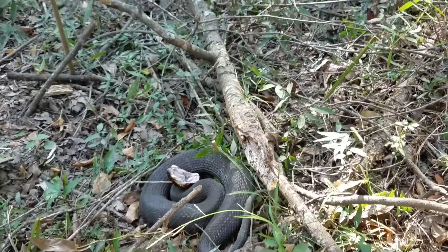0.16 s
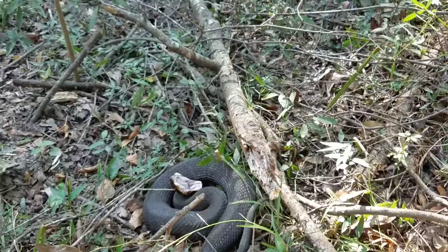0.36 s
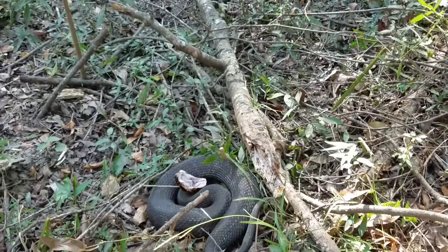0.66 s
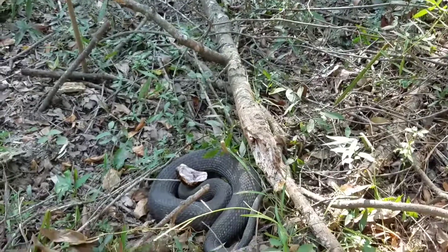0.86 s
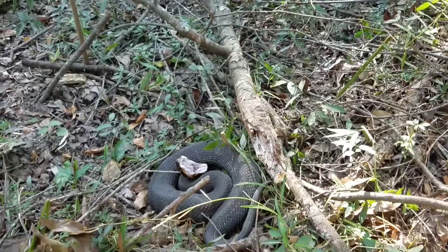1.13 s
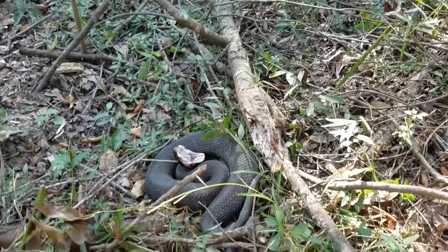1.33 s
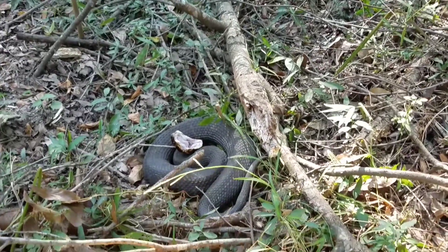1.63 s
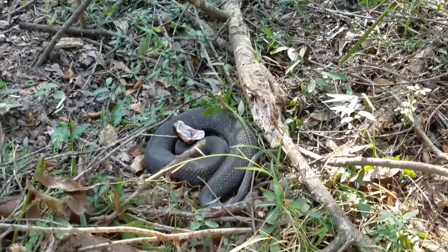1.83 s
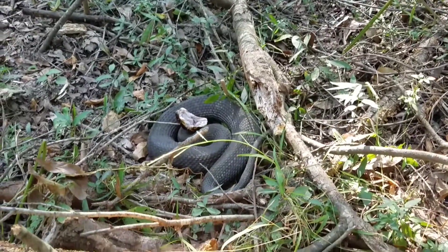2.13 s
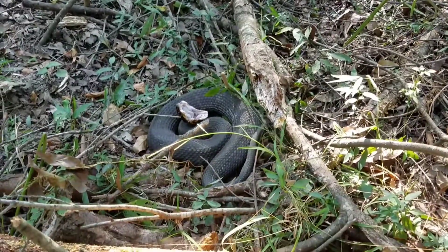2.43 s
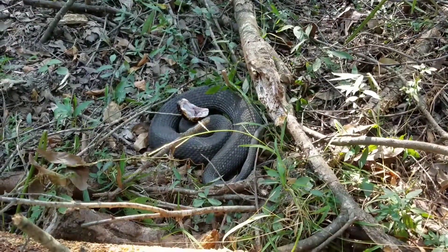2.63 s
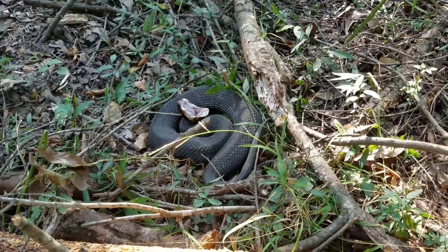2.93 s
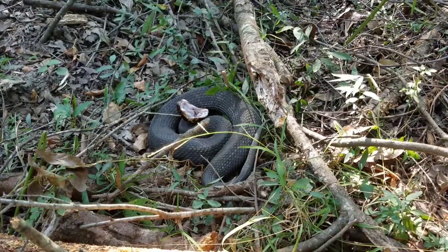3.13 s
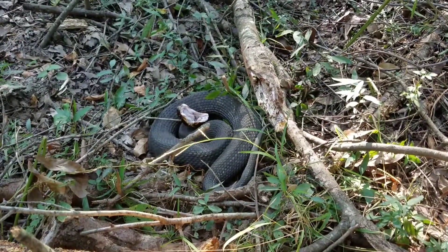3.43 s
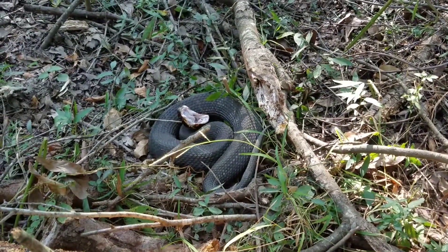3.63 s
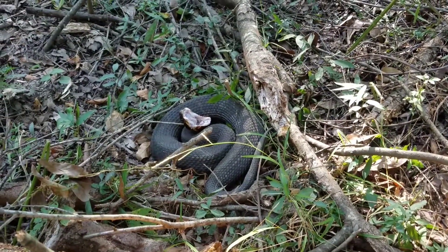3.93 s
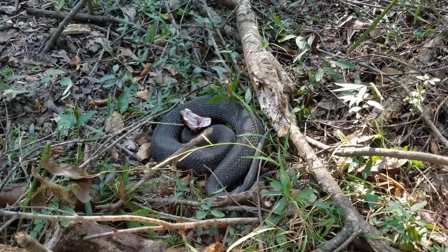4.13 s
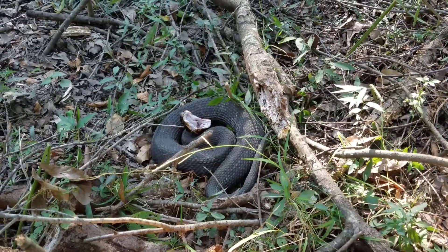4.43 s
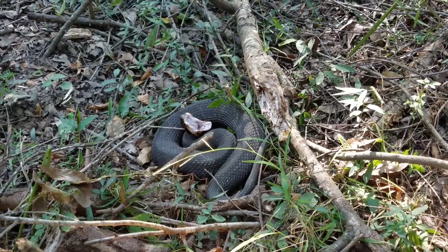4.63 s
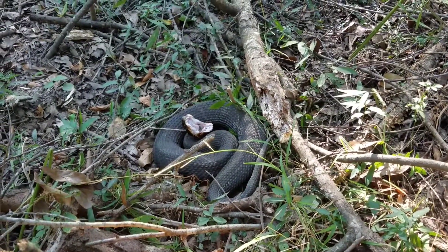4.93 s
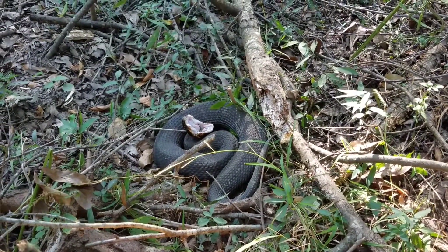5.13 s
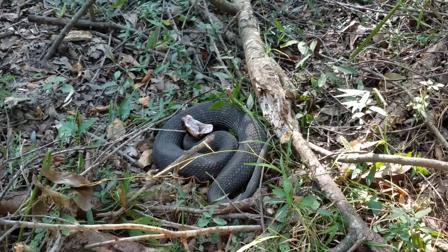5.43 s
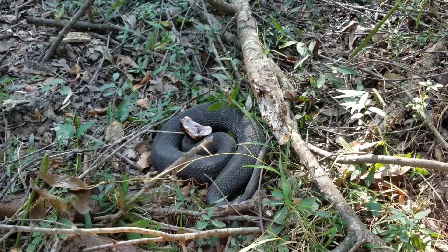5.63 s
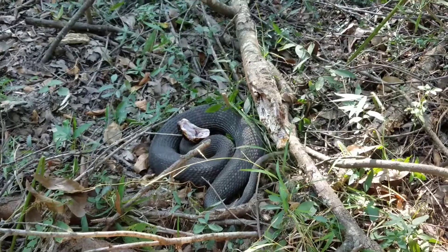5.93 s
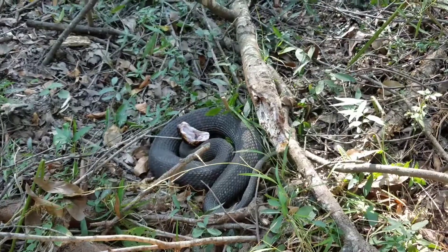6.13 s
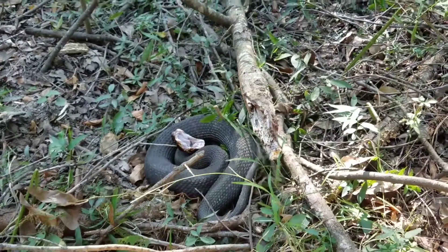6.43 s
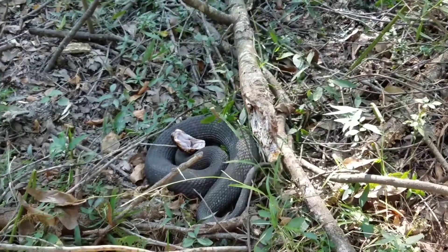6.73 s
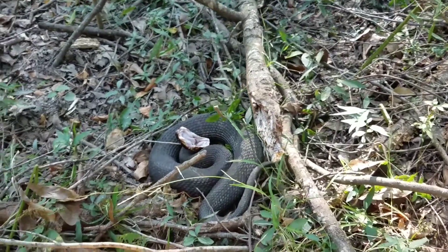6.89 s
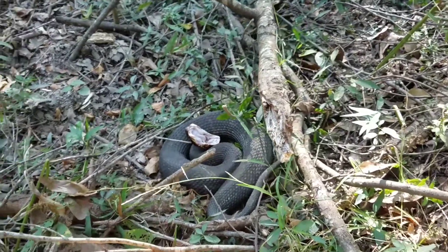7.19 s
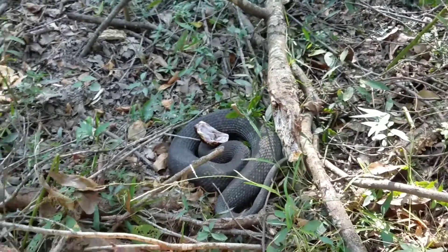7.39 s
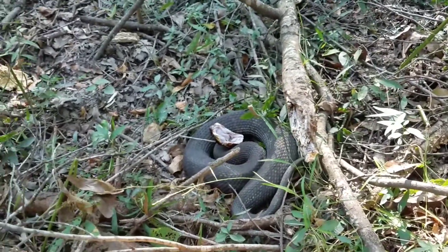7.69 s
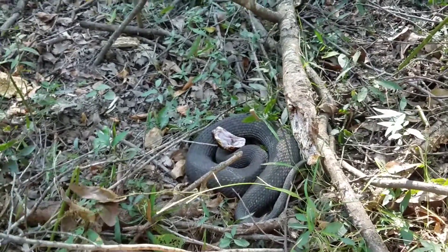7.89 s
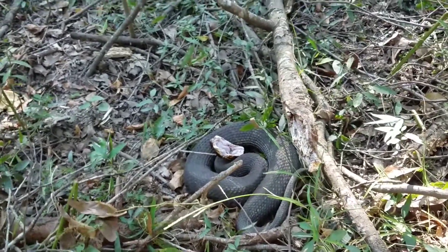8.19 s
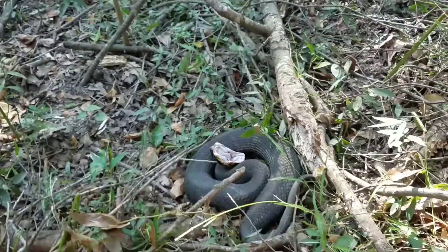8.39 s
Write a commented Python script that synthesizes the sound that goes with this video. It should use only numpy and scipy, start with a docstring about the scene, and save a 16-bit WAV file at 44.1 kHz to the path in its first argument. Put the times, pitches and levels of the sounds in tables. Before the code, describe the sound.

Soft outdoor hush, steady high insect tone and far-off puttering; light leaf touches give way to a short crunch and longer snapping rustle.

```python
"""A quiet forest floor: an insect trills thinly over a high chorus, and an engine putters far away.
Dry leaf litter is brushed lightly at first, then is pressed and shifted near a coiled snake:
a short crunch and a longer crackling rustle with sharp snaps of leaves and twigs.
Leaves are noise shaped by many tiny fractures, snaps are short noise bursts, the trill is a gliding
tone, the engine is a sum of exhaust harmonics, and the air and the chorus are coloured noise."""
import sys
import numpy as np
from scipy import signal
from scipy.fft import rfft, irfft, next_fast_len
from scipy.io import wavfile
from scipy.ndimage import uniform_filter1d

SR = 44100
rng = np.random.default_rng(int(sys.argv[2]) if len(sys.argv) > 2 else 0)


def transcribe(signal):
    """Save signal, clipped to [-1, 1], as a 16-bit WAV file at the path in sys.argv[1]."""
    frames = np.atleast_2d(signal).T
    limited = np.clip(frames, -1, 1)
    pcm = np.round(limited * 32767).astype(np.int16)
    wavfile.write(sys.argv[1], SR, pcm)


N = 377039
TIME = np.arange(N) / SR  # seconds
CUTOFF_HZ = 15800  # nothing much is heard above this
FIRM_DB = -48  # the level on the pressure curve that counts as firm pressure

# how alike left and right are in the open air: (frequency [Hz], likeness [-1 to 1])
AIR_LIKENESS = [(100, 0.77), (300, 0.054), (800, 0.048), (2000, 0), (5000, 0)]


def from_db(db):
    """Turn decibels into a gain."""
    return 10 ** (np.asarray(db) / 20)


def rms_one(x):
    """Scale a signal to an rms of 1."""
    return x / np.sqrt(np.mean(x ** 2) + 1e-20)


def in_time(rows):
    """Draw straight lines between the rows of a curve and read each column at every sample."""
    times, *columns = np.transpose(rows)
    return [np.interp(TIME, times, column) for column in columns]


def at_hz(points, hz):
    """Read a curve over frequency, with straight lines on a log-frequency axis."""
    known_hz, values = np.transpose(points)
    return np.interp(np.log(hz + 1), np.log(known_hz), values)


def panned(pan_db):
    """Left and right gains of constant power; pan_db is left minus right."""
    gains = from_db(np.array([[.5], [-.5]]) * pan_db)
    return gains / np.sqrt(np.mean(gains ** 2, axis=0))


def drift(rate_hz):
    """A smooth random wander around 0 with an rms of 1; a higher rate wanders faster."""
    step = 40  # samples between the points of the wander
    pole = np.exp(-2 * np.pi * rate_hz * step / SR)
    noise = rng.standard_normal(N // step + 2002)
    slow = signal.lfilter([1], [1, -2 * pole, pole * pole], noise)[2000:]  # skip the filter's start
    return np.interp(np.arange(N) / step, np.arange(len(slow)), rms_one(slow))


def band(x, low_hz, high_hz, order=2):
    """Keep only the frequencies between two edges."""
    edges = [low_hz, min(high_hz, .48 * SR)]
    return signal.sosfilt(signal.butter(order, edges, "band", fs=SR, output="sos"), x + 1e-18)


def decay(x, t60):
    """Let every impulse die away exponentially, by 60 dB in t60 seconds."""
    return signal.lfilter([1], [1, -from_db(-60 / (t60 * SR))], x + 1e-18)


def white():
    """Unrelated white noise for two channels."""
    return rng.standard_normal((2, N))


def coloured(x, spectrum, likeness):
    """Give two unrelated signals a spectrum and a likeness of left and right; rms 1."""
    size = next_fast_len(N)
    hz = np.arange(size // 2 + 1) * SR / size
    lowest_hz, highest_hz = spectrum[0][0], spectrum[-1][0]
    # fade out beyond both ends of the spectrum
    inside = 1 / (1 + (lowest_hz / (hz + 1)) ** 8) / (1 + (hz / highest_hz / 1.15) ** 16)
    mid, side = rfft(x, size) * from_db(at_hz(spectrum, hz)) * inside
    alike = at_hz(likeness, hz)
    stereo = np.sqrt(1 + alike) * mid + np.sqrt(1 - alike) * side * [[1], [-1]]
    return rms_one(irfft(stereo, size)[:, :N])


def gesture(start, hold, attack, release):
    """Rise to 1 by the start, hold, and fall back to 0 (all in seconds)."""
    rise = (TIME - start) / attack
    fall = (start + hold - TIME) / release
    return np.clip(np.minimum(rise, fall) + 1, 0, 1)


def air():
    """The still air is a soft, steady, mostly low noise."""
    # colour of the air: (frequency [Hz], relative level [dB])
    air_colour = [(25, -14), (50, 5.5), (110, 13), (200, 2), (300, 0), (500, -4), (1000, -7), (2500, -10.5),
                  (4000, -16), (6500, -21), (10000, -22.5), (15500, -12)]
    return from_db(-62.5) * coloured(white(), air_colour, AIR_LIKENESS) * panned(-1.7)


def insects():
    """A near insect's wing strokes each give a short arched note; many far ones merge into a noise band."""
    # near insect: (time [s], level [dB])
    trill_level = [(2.03, -53), (2.08, -68), (2.35, -56), (3.5, -55), (6.8, -54.5), (7.9, -59)]
    # colour of the far chorus: (frequency [Hz], relative level [dB])
    chorus_colour = [(6900, -39), (7400, -13.5), (7750, -0.5), (8100, 2), (8450, 4.5), (8650, -3.5),
                     (8850, -8.5), (9200, -18)]
    level_db, = in_time(trill_level)
    # 32.38 strokes per second; the place within a stroke runs from -0.5 to 0.5
    stroke = (32.38 * TIME + .04 + .05 * drift(1)) % 1 - .5
    note = np.exp(-np.abs(stroke / 0.19) ** 3)
    # the pitch is highest in the middle of the note
    pitch_hz = 8610 - 100 * np.minimum((stroke / .16) ** 2, 3) + 18 * drift(40)
    tone = np.sin(2 * np.pi * np.cumsum(pitch_hz) / SR)
    trill = note * tone * from_db(level_db + 0.58 * drift(33))
    chorus = from_db(-64.5) * coloured(white(), chorus_colour, AIR_LIKENESS)
    return trill * panned(-33.0) + chorus * panned(-0.47)


def engine():
    """Exhaust pulses follow the revs; muffler and distance leave a low thud, a weak pipe ring and a drone."""
    # speed of the engine: (time [s], exhaust pulses per second [1/s])
    engine_rate = [(0,22.7),(.25,23.5),(.92,21.6),(1.74,17.4),(2.05,23.7),(2.38,17),(2.75,21.2),(3.05,20.1),(3.85,26.5),(4.45,27.8),(4.8,26.6),(5.12,27.8),(6.6,24),(6.95,28),(7.33,26.2),(7.8,19.7),(7.97,24),(8.55,25.3)]
    # loudness of its thud: (time [s], level [dB])
    engine_level = [(0.0, -56), (0.04, -58), (1.74, -61.5), (2.07, -57), (2.36, -67), (2.6, -58),
                    (3.83, -58), (3.88, -61), (4.93, -55), (5.07, -61), (5.38, -59), (7.36, -56),
                    (7.43, -50.5), (7.81, -53.5), (7.83, -59), (8.19, -54), (8.48, -58), (8.55, -52)]
    # exhaust harmonics 1 to 8: (relative level under load [dB], with the throttle shut [dB])
    exhaust = [(-27, -21), (-9, -8), (-30, 6), (-13.5, 5.5), (3, 9), (3, 0), (-11, -18), (-4, -20)]
    (rate,), (level_db,) = in_time(engine_rate), in_time(engine_level)
    shut = gesture(start=7.39, hold=0.17, attack=0.11, release=0.44)  # the engine coasts once
    phase = 2 * np.pi * np.cumsum(rate * (1 + 0.0013 * drift(8.3))) / SR

    pulses = np.zeros(N)
    for harmonic, (loaded_db, coasting_db) in enumerate(exhaust, 1):
        harmonic_db = loaded_db + shut * (coasting_db - loaded_db)
        pulses += from_db(harmonic_db) * np.cos(harmonic * phase)
    uneven = pulses * from_db(1.34 * drift(22))
    thud = signal.sosfilt(signal.butter(10, 137, fs=SR, output="sos"), uneven)
    thud = thud / np.sqrt(uniform_filter1d(thud ** 2, size=8000) + 1e-9)  # even out the loudness

    firings = np.diff(phase // (2 * np.pi), prepend=0)  # one click per exhaust pulse
    pipe_db = np.interp(rate, [18, 26], [-77, -85])  # the pipe rings most at low revs
    pipe = from_db(pipe_db) * rms_one(band(firings, 252, 291))
    drone = from_db(-77.5) * rms_one(band(rng.standard_normal(N), 183.3, 195.0))
    return (from_db(level_db) * thud + pipe + drone) * panned(-2.1)


def bumps():
    """Weight settling on soft soil gives short dull knocks: fading noise with its treble removed."""
    # knocks: (time [s], peak level before the common lift [dB], upper edge [Hz])
    knocks = [(0.092,-51,760),(0.262,-52.5,413),(.612,-60,694),(2.496,-55,385),(6.126,-40,1010),(6.775,-47.5,694),(6.864,-52,502),(7.149,-38.5,750),(7.246,-38.5,500),(7.371,-43.5,613),(7.491,-57,413),(7.723,-40.5,450),(7.974,-55,402.5)]
    lift_db = 3.5
    out, size = np.zeros(N), SR // 6
    fade = from_db(-60 * np.arange(size) / SR / 0.066)  # 60 dB in 0.066 s
    for (s, peak_db, top_hz), noise in zip(knocks, rng.standard_normal((len(knocks), size))):
        knock = band(noise * fade, 92, top_hz)
        start = int(s * SR)
        out[start:start + size] += knock / np.abs(knock).max() * from_db(peak_db + lift_db)
    return out


def fractures(per_s, spread_db, t60):
    """Power of tiny leaf fractures: random moments, mostly small, each dying fast; local mean about 1."""
    sizes = from_db(spread_db * np.minimum(rng.exponential(1, N), 3.5))
    breaks = rng.random(N) < per_s / SR
    power = decay(breaks * sizes ** 2, t60 / 2)  # power needs half the t60 of the sound
    return power / (uniform_filter1d(power, size=4000) + 1e-3)


def crackle(given, spectrum, per_s, spread_db, t60, own, scatter):
    """Fractures, a given part of them its own and the rest handed in, over a smooth leaf hiss."""
    # how alike left and right are: (frequency [Hz], likeness [-1 to 1])
    leaf_likeness = [(200, 0.79), (600, 0.92), (1300, 0.8), (2600, -0.32), (6000, 0.058), (12000, -0.086)]
    power = (1 - own) * given + own * fractures(per_s, spread_db, t60) + scatter
    return coloured(white() * np.sqrt(power), spectrum, leaf_likeness)


def touch():
    """Strength of the light brushing: each touch swells, holds and lets go."""
    # light touches: (time [s], length [s], level [dB])
    touches = [(.01, 0.16, -61.5), (0.34, .22, -66), (1.77, 0.24, -70.5), (2.202, 0.414, -60.5),
               (5.26, .1, -67.5), (5.718, 0.31, -67.5)]
    return sum(from_db(db) * gesture(s, length, attack=0.14, release=0.11) for s, length, db in touches)


def brushing():
    """Leaves that barely touch give uneven swishes with faint ticks in them."""
    # colour of the brushing: (frequency [Hz], relative level [dB])
    brush_colour = [(250, -2.5), (1200, -6.5), (2300, -13), (3000, -1), (5000, -8.5), (6200, -4),
                    (7100, -17.5), (10300, 2), (11800, -12), (13300, 2), (15500, -18)]
    ticks = fractures(160, spread_db=17.0, t60=0.011)
    swish = touch() * from_db(3.0 * drift(4.4))
    leaves = crackle(ticks, brush_colour, 490, spread_db=13.5, t60=0.011, own=0.4, scatter=0.62)
    return swish * panned(-4.0) * leaves


def pressure():
    """How hard the litter is pressed, in dB above firm pressure."""
    # pressure in the short crunch: (time [s], level [dB])
    crunch_curve = [(5.72, -79), (5.96, -62.5), (6.11, -40), (6.18, -42.5), (6.25, -58.5), (6.47, -56.5),
                    (6.66, -62)]
    # pressure in the longer rustle: (time [s], level [dB])
    rustle_curve = [(6.74, -57.0), (6.79, -53.5), (6.89, -52.5), (7.04, -45.5), (7.179, -46.5),
                    (7.281, -40), (7.33, -45.5), (7.384, -38), (7.48, -51.0), (7.6, -53.5), (7.68, -47.5),
                    (7.745, -41), (7.83, -49.0), (8.0, -51.5), (8.1, -50.0), (8.28, -54.0), (8.44, -51),
                    (8.55, -55.5)]
    level_db, = in_time([*crunch_curve, *rustle_curve])
    return level_db - FIRM_DB


def pressed():
    """The litter lies still until it is pressed: 0, then 1."""
    return np.clip((TIME - 5.72) / 0.1, 0, 1)


def leaf_pops():
    """Curled leaves spring back, in time more often, each with a hollow pop at one of ten pitches."""
    per_s = np.interp(TIME, [5.9, 6.2, 7.5, 7.8], [0, 10, 14, 55])
    sizes = from_db(4 * np.minimum(rng.exponential(1, N), 1.8))
    clicks = (rng.random(N) < per_s / SR) * sizes
    pitches_hz, dealt = np.geomspace(1150, 2100, num=10), rng.integers(0, 10, N)
    pops = np.zeros(N)
    for k, hz in enumerate(pitches_hz):
        pops += signal.lfilter(*signal.iirpeak(hz, 4, fs=SR), clicks * (dealt == k) + 1e-18)
    return from_db(np.minimum(pressure(), -3) - 14.0) * pops * panned(-3.5)


def lesser_snaps(count):
    """Small snaps fall at random, sized by how much the leaves move; same columns as the loud snaps."""
    # level above the movement around the snap: (body [dB], crack [dB], crisp top [dB])
    above_movement = (-1.5, -0.73, 3.6)
    spread_db, limit_db = 2.5, -57  # scatter between snaps; movement beyond which they grow no louder
    moving = touch() + pressed() * from_db(FIRM_DB + pressure())
    moving = np.minimum(moving, from_db(limit_db))
    at, chance = rng.integers(0, N, count), rng.standard_normal((count, 4))
    moving_db = 20 * np.log10(moving[at, None] + 1e-9)
    levels_db = moving_db + above_movement + spread_db * chance[:, :3]
    pan_db = 4 * chance[:, 3] - 2
    return np.column_stack([at / SR, levels_db, pan_db])


def snap_band(rows, levels_db, low_hz, high_hz, break_t60, leaf_db, leaf_t60, tail_db, tail_t60, alike, ring_db):
    """Each snap: an abrupt break, a short ringing of its own leaf, a faint tail off the ground."""
    out, size = np.zeros((2, N + SR // 4)), SR // 8
    t = np.arange(size) / SR
    shape = from_db(-60 * t / break_t60)
    shape = shape + from_db(leaf_db - 60 * t / leaf_t60) + from_db(tail_db - 60 * t / tail_t60)
    noise, places = rng.standard_normal((len(rows), 2, size)), rng.random(len(rows))
    pairs = np.sqrt(1 + alike) * noise[:, :1] + np.sqrt(1 - alike) * noise[:, 1:] * [[1], [-1]]
    bursts = band(pairs * shape, low_hz, high_hz)
    for (s, *_, pan_db), level_db, place, burst in zip(rows, levels_db, places, bursts):
        # each leaf rings at its own pitch within the band
        leaf_hz = low_hz + (.2 + .6 * place) * (min(high_hz, CUTOFF_HZ) - low_hz)
        burst = burst + from_db(ring_db) * signal.lfilter(*signal.iirpeak(leaf_hz, 6, fs=SR), burst)
        # the rms of the first 5 ms sets the level
        attack = np.sqrt(np.mean(burst[:, :SR // 200] ** 2, axis=1, keepdims=True))
        start = int(s * SR)
        out[:, start:start + size] += burst / attack * from_db(level_db) * panned(pan_db)
    return out[:, :N]


def snaps():
    """Brittle leaves and twigs break, in three bands; their low part rings longest."""
    # loudest snaps, levels before each band's trim:
    # (time [s], body level [dB], crack level [dB], crisp top level [dB], left minus right [dB])
    loud_snaps = [(0.041, -59, -54.5, -44.5, -4.5), (0.231, -62.5, -58, -51, 1),
                  (0.3455, -64, -69, -44, -4), (0.3707, -66, -54.5, -47, -2), (0.4845, -59.5, -53, -43, -2),
                  (1.9681, -61, -68, -49.5, -2), (2.039, -65, -52.5, -49.5, -4), (2.09, -77, -41.5, -39, 0),
                  (2.1158, -73, -55, -73, -2), (2.1415, -81, -48.5, -71, 0), (2.209, -70, -62, -42.5, 0),
                  (3.794, -63.5, -65, -68, -7), (5.2782, -57.5, -84, -65, -3), (5.645, -63.5, -62, -58, -6),
                  (5.798, -57, -61.5, -54, 1), (5.8805, -44.5, -47, -42.5, 0), (5.9916, -45, -53, -46, -4),
                  (6.1293, -38.5, -56, -37, 0), (6.1593, -38.5, -37, -44, 6), (6.1936, -42.5, -36, -52, -3),
                  (6.2272, -76, -46.5, -35, -4), (6.6735, -52, -36, -43, -4),
                  (6.775, -37.5, -36.5, -33.5, -2.5), (6.8641, -35.5, -40, -43.5, -2.5),
                  (6.9842, -57, -37.5, -37.5, -5), (7.0181, -44, -39.5, -46, -2),
                  (7.091, -36, -39.5, -38, -2), (7.1342, -48, -58, -34, 2), (7.37, -37.5, -45, -47, -1),
                  (7.3854, -57, -52, -34, 4), (7.4002, -52, -51, -27.5, 6), (7.492, -55, -41, -27, 0),
                  (7.51, -46.5, -46, -44, -4), (7.5963, -73, -51, -30, -1), (7.6518, -39.5, -57, -35.5, 0),
                  (7.7033, -43, -37, -28.5, -6), (7.72, -42, -33, -29, -5), (7.7251, -33.5, -33, -20, 5),
                  (7.731, -41, -33.5, -30, -3), (7.7972, -51, -38, -25.5, -3),
                  (7.8551, -41, -46.5, -39, -1), (7.9485, -43, -46, -40.5, -2), (8.0483, -46, -44, -37, -4),
                  (8.0575, -42, -41.5, -35.5, 2), (8.3058, -35.5, -42, -36, 2), (8.4257, -40, -42, -46, 3),
                  (8.4409, -40, -50, -41, 1), (8.4783, -40, -44, -35, 5)]
    rows = np.vstack([loud_snaps, lesser_snaps(count=60)])
    _, body_db, crack_db, top_db, _ = rows.T
    body = snap_band(rows, body_db, 750, 2600, break_t60=.003, leaf_db=-6, leaf_t60=.02,
                     tail_db=-24, tail_t60=.12, alike=.35, ring_db=4)
    crack = snap_band(rows, crack_db, 1940, 7680, break_t60=0.00075, leaf_db=-2, leaf_t60=0.022,
                      tail_db=-40, tail_t60=0.049, alike=-0.32, ring_db=12.5)
    top = snap_band(rows, top_db, 9900, 23300, break_t60=0.00068, leaf_db=-9.5, leaf_t60=0.016,
                    tail_db=-28, tail_t60=0.038, alike=0, ring_db=-32)
    return body * panned(-6.0) * from_db(-0.76) + crack * panned(0.24) + top * from_db(1.0)


def rustle():
    """Harder pressing breaks more leaves per second; big leaves sound low, dry edges high."""
    # colour of the big leaves: (frequency [Hz], relative level [dB])
    body_colour = [(130, -5.5), (230, -0.5), (350, -3.5), (550, -1.5), (720, -3.5), (900, 0.5), (1150, -6)]
    # colour of the breaking leaf blades: (frequency [Hz], relative level [dB])
    blade_colour = [(500, -16), (900, -8.5), (1600, 3), (2200, -1), (3000, 5), (3600, -3.5), (4800, 1.5),
                    (6100, -3.5), (7100, -6), (8500, -0.5), (11000, -7)]
    # colour of their dry edges: (frequency [Hz], relative level [dB])
    edge_colour = [(6500, 9.5), (9000, -18.5), (10400, 6.5), (11700, 3), (13300, 8.5), (15500, 7.5)]
    # where the litter moves, before each band's offset: (time [s], left minus right [dB])
    litter_pan = [(6.2, -6.5), (6.9, -5.5), (7.3, -3.5), (7.7, -2), (8.5, -4.5)]
    press_db = pressure()
    pan_db, = in_time(litter_pan)
    per_s = 480 * from_db(.8 * press_db)  # fractures per second
    common = fractures(per_s, spread_db=4.5, t60=.012)  # heard in both the blades and the edges
    body = crackle(common, body_colour, per_s / 2, spread_db=5.0, t60=0.027, own=1.0, scatter=0.057)
    blades = crackle(common, blade_colour, per_s, spread_db=4.5, t60=.016, own=.35, scatter=.2)
    edges = crackle(common, edge_colour, per_s, spread_db=5.0, t60=.006, own=.45, scatter=.25)
    # level at firm pressure [dB], plus the dB gained per dB of pressure
    body = body * from_db(-58.5 + 0.77 * press_db) * panned(-0.64)
    blades = blades * from_db(-47.5 + 0.93 * press_db) * panned(pan_db - .6)
    edges = edges * from_db(-47.5 + 0.91 * press_db) * panned(pan_db + 4.0)
    return pressed() * (body + blades + edges)


def scene():
    """Engine and air far off, insects in the undergrowth, litter close by."""
    far = air() + engine()
    litter = bumps() + brushing() + leaf_pops() + snaps() + rustle()
    return far + insects() + litter


def record(dry):
    """Cut the top of the treble steeply."""
    return signal.sosfilt(signal.ellip(10, .1, 70, CUTOFF_HZ, fs=SR, output="sos"), dry)


dry = scene()
out = record(dry)
transcribe(out)
```